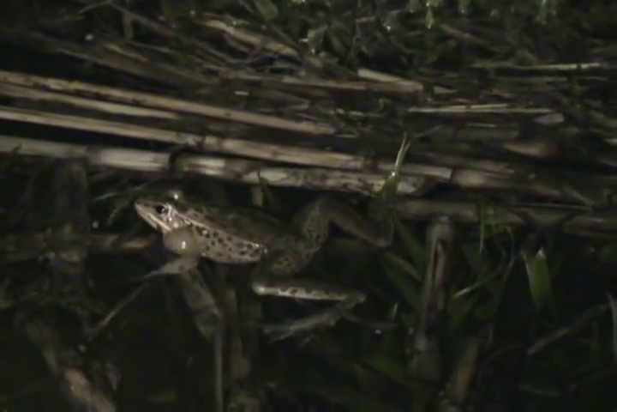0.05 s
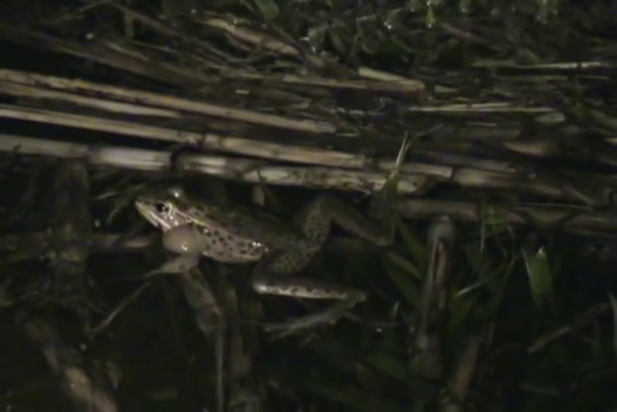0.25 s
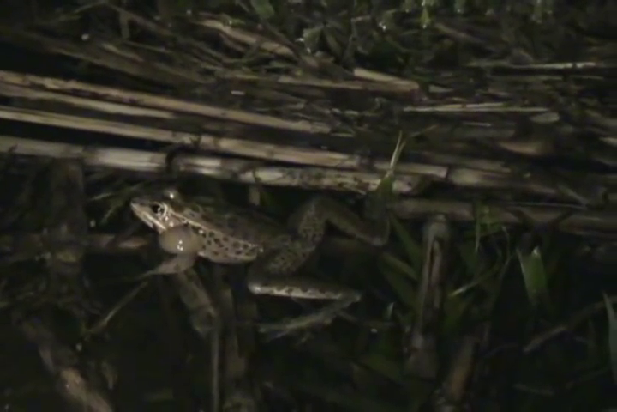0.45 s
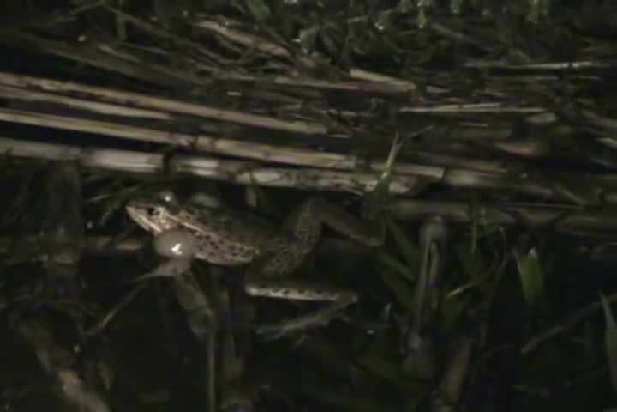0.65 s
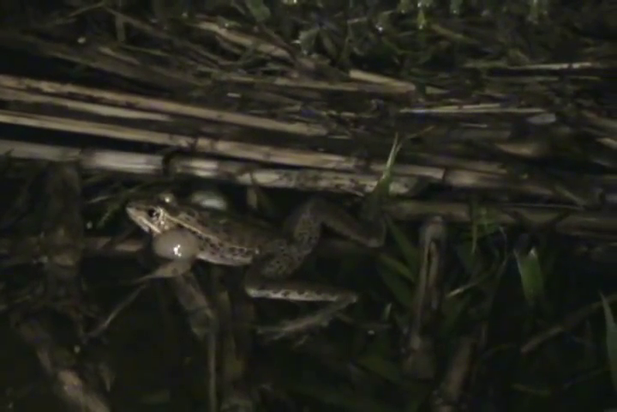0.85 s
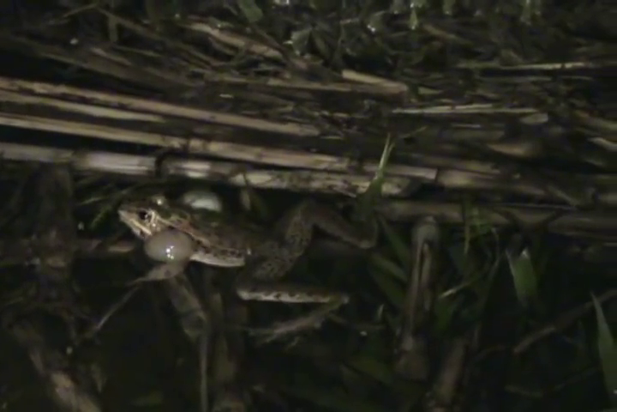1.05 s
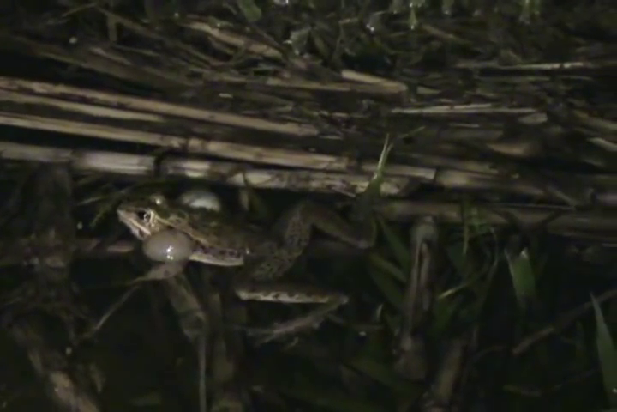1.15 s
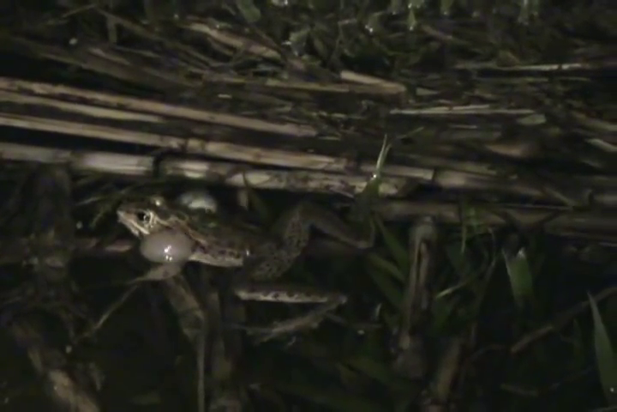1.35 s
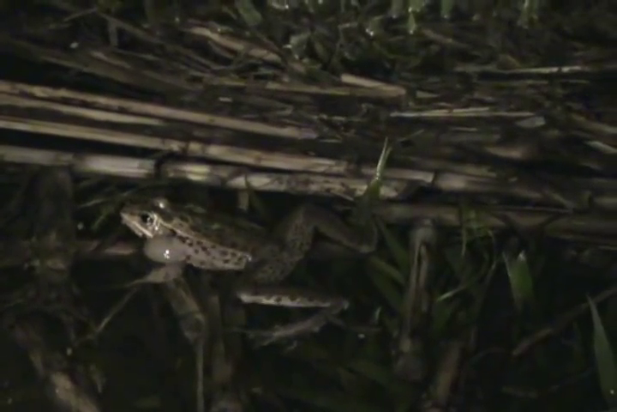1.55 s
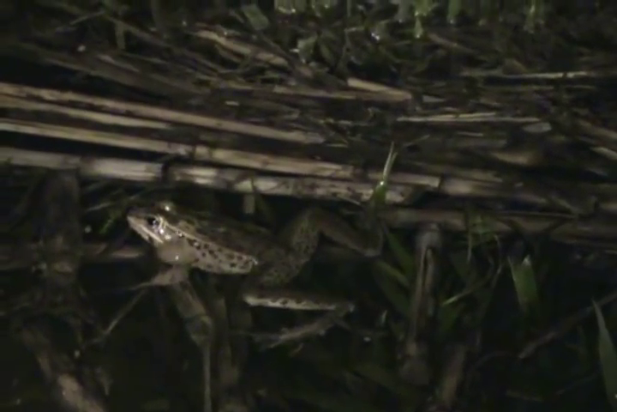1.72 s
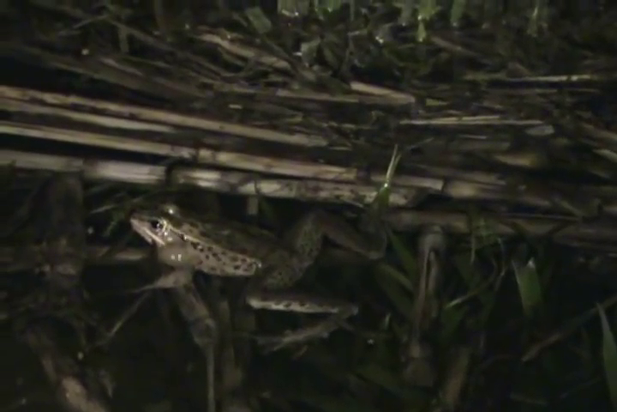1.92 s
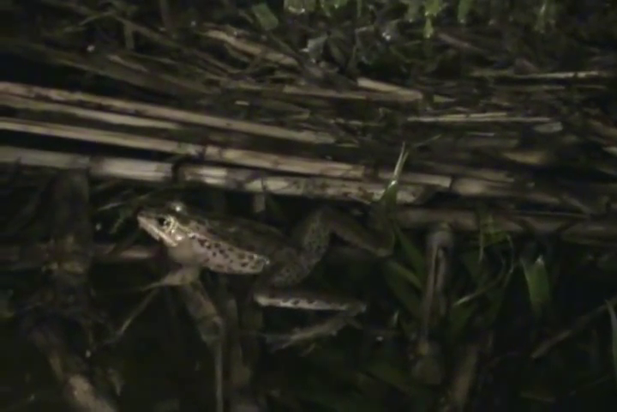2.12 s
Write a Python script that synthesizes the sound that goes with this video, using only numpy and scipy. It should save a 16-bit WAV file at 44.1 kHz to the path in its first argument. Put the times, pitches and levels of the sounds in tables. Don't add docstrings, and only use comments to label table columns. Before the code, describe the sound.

A leopard frog close to the microphone clucks eight times, about every 0.18 seconds from 0.1 to 1.33: the first two faint, then full and loud, each a rapid rattling, hollow burst ending in a soft thump. Small frogs click steadily around 3 kHz, strongest from 0.5 to 1.4, with rising whistled peeps brightest near 1.0-1.4. Afterwards fainter peeps, clicks, distant grumbling clucks and night hiss remain.

```python
import sys
import numpy as np
from scipy import signal
from scipy.fft import rfft, irfft
from scipy.io import wavfile
from scipy.ndimage import uniform_filter1d, map_coordinates

SR = 44100
rng = np.random.default_rng(int(sys.argv[2]) if len(sys.argv) > 2 else 0)


def digitize_waveform(pressure):
    field = np.atleast_2d(pressure).T
    bounded = np.clip(field, -1, 1)
    quanta = np.round(bounded * 32767).astype(np.int16)
    wavfile.write(sys.argv[1], SR, quanta)


def voltage_ratio(decibels):
    exponent = np.asarray(decibels, float) / 20
    return 10 ** exponent


N = 94815


def leopard():
    # last_pulse_s, level_db, top_rate_hz, last_pulse_db, stretch
    call_table = [
        (0.1011, -29.5, 344, 5, 1.03),
        (0.2701, -19, 359.6, -1, 1.11),
        (0.4365, -7.5, 368.8, 3, 0.96),
        (0.613, -5.5, 389, 2.5, 1.14),
        (0.7907, -5.5, 401.6, -10.5, 1.135),
        (0.967, -4, 423, 4, 1.0),
        (1.148, -5, 435, 4, 1.01),
        (1.326, -2.5, 426, -11, 1),
    ]
    # sac_pitch_factor, early_swell_db, rasp_hz, rasp_db
    colour_table = [
        (0.923, 9.5, 4240, -36),
        (0.986, 5, 3770, -23.5),
        (1.008, 1.5, 3300, -17.5),
        (0.993, 2, 2550, -18),
        (1.012, 2, 3150, -25.5),
        (0.992, 0.5, 4500, -24),
        (0.963, 2, 4060, -20),
        (0.957, -3.5, 3990, -17),
    ]
    # time_s, level_db
    late_table = [
        (0.9747, -2.5),
        (1.155, -3.5),
        (1.3305, -3),
    ]
    # mode_hz, width_hz, level_db
    slack_modes = [
        (604, 183, 0.5),
        (1160, 120, -7.5),
        (1830, 200, -15),
    ]
    jitter = 0.008
    rasp_width_hz, rasp_follows_swell = 250, 0.5
    rasp_starts_s, rasp_ends_s = 0.053, 0.024
    thump_hz, thump_width_hz, thump_db = 547, 97, -8

    late_s, late_db = np.array(late_table).T
    voice = sac(pulses(late_s, voltage_ratio(late_db)), modes=slack_modes)
    rasp = thump = 0
    for (end, db, hz, stretch_last_db, stretch), colour in zip(call_table, colour_table):
        pitch, early_db, rasp_hz, rasp_db = colour
        at, ago, swell = cluck(end, hz, stretch, jitter)
        early = early_db * np.clip(ago / 0.033, 0, 1)
        size_db = db + swell + stretch_last_db * (ago == ago[0]) + early
        voice = voice + sac(pulses(at, voltage_ratio(size_db)), pitch=pitch)

        thin = voltage_ratio(rasp_follows_swell * swell + rasp_db) * np.clip(ago / rasp_ends_s, 0, 1) ** 2
        rasp = rasp + ring(pulses(at, thin * (ago < rasp_starts_s)), rasp_hz, rasp_width_hz)

        final = max([end] + [s for s in late_s if 0 < s - end < 0.02])
        blow = pulses(np.array([final]), voltage_ratio(np.array([db + thump_db])))
        thump = thump + ring(blow, thump_hz * hz / 390, thump_width_hz)
    thump = nolow(uniform_filter1d(thump, size=40), 424)
    return pan(voice + nolow(rasp, 2500) + thump, -1.8)


def cluck(end, hz, stretch, jitter):
    # before_last_pulse_s, share_of_top_rate
    rate_curve = [(0, .5), (.004, .66), (.009, .8), (.015, .89), (.025, .96), (.04, 1.0), (.06, .97),
                  (.1, .88)]
    # before_last_pulse_s, level_db
    swell_curve = [(0, -4.5), (.006, 1.5), (.014, -1.5), (.022, -6.5), (.031, -9.5), (.045, -15.5),
                   (.063, -31), (.1, -34)]
    back = np.arange(0, 0.11, 1 / SR)
    rate = hz * np.interp(back / stretch, *np.array(rate_curve).T)
    turns = np.cumsum(rate) / SR
    k = np.arange(int(turns[-1]))
    ago = np.interp(k, turns, back)
    level_chance, time_chance = rng.standard_normal((2, 50))
    swell = np.interp(ago / stretch, *np.array(swell_curve).T) + 0.9 * level_chance[k]
    return end - ago + jitter / hz * time_chance[k], ago, swell


def sac(x, wider=1, pitch=1, modes=None):
    # mode_hz, width_hz, level_db
    sac_modes = [
        (556.5, 130, -3.5),
        (750, 167, -12.5),
        (1112, 215, -7.5),
        (1370, 124, 2.5),
        (1840, 200, -27),
        (2200, 3200, -78),
    ]
    x = signal.lfilter(*signal.butter(2, 2500, fs=SR), x)
    out = 0
    for hz, width, db in (sac_modes if modes is None else modes):
        out = out + voltage_ratio(db) * wider * ring(x, hz * pitch, width * wider)
    return nolow(out, 588)


def ring(x, hz, width):
    r, w = np.exp(-np.pi * width / SR), 2 * np.pi * hz / SR
    return signal.lfilter([0, np.sin(w)], [1, -2 * r * np.cos(w), r * r], x)


def pulses(times, sizes):
    out, at = np.zeros(N + 40), np.clip(times * SR, 10, N)
    i = at.astype(int)[:, None] + np.arange(-7, 9)
    d = i - at[:, None]
    np.add.at(out, i, sizes[:, None] * np.sinc(d) * np.cos(np.pi * d / 16) ** 2)
    return out[:N]


def peepers():
    # start_s, length_s, start_hz, end_hz, level_db
    peep_table = [(-.1, 0.18, 2813, 3093, -26), (-.02, 0.38, 2550, 3080, -34.5),
                  (0.041, 0.42, 2500, 2827, -48.5), (0.106, 0.29, 2625, 3090, -38),
                  (0.493, 0.1, 2487, 2720, -25), (0.979, 0.06, 2830, 2926, -21),
                  (1.035, 0.026, 2940, 3020, -14.5), (1.068, 0.043, 3030, 3134, -12.5),
                  (1.153, 0.058, 3195, 3330, -23), (1.043, 0.095, 2573, 2760, -26),
                  (1.158, 0.049, 2730, 2936, -26), (1.195, 0.2, 2646, 3044, -10.5),
                  (1.117, 0.021, 3140, 3260, -30), (1.292, 0.36, 2637, 3002, -31),
                  (1.469, 0.17, 2480, 2820, -38), (1.606, 0.18, 2563, 2980, -28.5),
                  (1.67, .222, 2655, 3147, -24), (1.741, .21, 2611, 3040, -23),
                  (1.776, 0.24, 2500, 2757, -40), (1.996, 0.097, 2622, 2772, -37.5)]
    peep_pan = [-16.5, 3, 34, -35, 5.5, -6, 6, 3, 2, -14, 8, 2.5, 6, -7, 24, -2, -12, 7.5, -25, 16.5]
    # frequency_ratio, level_db
    partials = [
        (.5, -38),
        (1.5, -33),
        (2, -36),
    ]
    rise_s, fall_s, bend = 0.011, 0.003, 0.0985
    swell_db, push_db, waver_db = 2, 1.83, 0.03
    out, t = 0, np.arange(N) / SR
    for (start, length, hz0, hz1, db), pan_db in zip(peep_table, peep_pan):
        u = np.clip((t - start) / length, 0, 1)
        hz = hz0 + (hz1 - hz0) * (u + bend * u * (1 - u))
        phase = 2 * np.pi * np.cumsum(hz) / SR
        env = np.clip(np.minimum(u * length / rise_s, (1 - u) * length / fall_s), 0, 1)
        breath_db = swell_db * (u - 3.5) + push_db * np.sin(2 * np.pi * u)
        env = env * voltage_ratio(db + 1.0 + breath_db + waver_db * walk(27.8))
        tone = np.sin(phase)
        for ratio, partial_db in partials:
            tone = tone + voltage_ratio(partial_db) * np.sin(ratio * phase)
        out = out + pan(env * tone, pan_db)
    return out


def clickers():
    # time_s, peak_db, pitch_hz
    near_table = [(0.52, -15, 2810), (0.5905, -12.5, 2885), (0.6652, -11, 2790), (0.7437, -8, 2840),
                  (0.828, -9, 2905), (0.9185, -8.5, 2964), (1.013, -8, 3019), (1.1149, -7, 3070),
                  (1.2201, -7, 3043), (1.3239, -18, 3160), (1.4056, -12, 3040), (1.4995, -28, 3190)]
    # time_s, peak_db, pitch_hz, left_minus_right_db
    other_table = [(0.0844, -26, 2810, -13), (0.1326, -28, 2880, 9), (0.2653, -16.5, 2883, -14),
                   (0.3386, -27, 3030, -16), (0.3833, -19.5, 2690, -1), (0.414, -23.5, 3060, 3),
                   (0.4529, -19, 2735, -1), (0.489, -22, 2920, 8), (0.6347, -30, 2980, 10),
                   (0.8085, -23, 2800, -18), (0.871, -57, 2780, -10), (0.8875, -22.5, 2910, 4),
                   (1.947, -34, 2800, -12), (0.1715, -25.5, 2980, -16), (0.3601, -19, 3046, -11.0),
                   (0.4599, -18, 3056, -11.0), (0.5581, -16.5, 3070, -13), (0.6514, -15.5, 3104, -9.5),
                   (0.7223, -20, 3170, -16), (1.5524, -27, 3015, 12), (1.9804, -27.5, 3120, 11),
                   (1.9984, -32, 3290, -10), (2.0283, -24.5, 3160, 5), (2.0647, -30, 3230, 12),
                   (2.0867, -31, 3030, 1), (2.1111, -28, 3190, -12), (2.1274, -29.5, 2975, -11),
                   (.001, -21, 2904, -11), (.032, -33, 3310, -5), (.279, -25, 2780, 7),
                   (.291, -29, 2970, -3), (.318, -21, 2720, -9), (.7068, -24, 2960, 4),
                   (.908, -21, 2980, 5), (.9517, -20, 2660, -2), (.99, -22, 3000, 19),
                   (1.281, -25, 3160, 0), (1.6851, -29, 2640, -6)]
    # time_s, peak_db
    low_table = [(1.432, -30), (1.487, -28), (1.546, -27), (1.603, -28.5), (1.661, -29), (1.728, -30),
                 (1.7908, -22.5), (1.8617, -27.5), (1.927, -33), (2.0023, -33.5), (2.073, -33),
                 (2.141, -36)]
    near = clicks([(*row, -1.5) for row in near_table], -17.5)
    low = clicks([(*row, 2480, 1.5) for row in low_table], -28)
    return near + clicks(other_table, -18) + low + crowd()


def crowd():
    (when, depth), (tune, side) = rng.random((500, 2)).T, rng.standard_normal((500, 2)).T
    peak_db = -35 - 2 * np.log(0.016 + depth)
    return clicks(zip(when * N / SR, peak_db, 2873 + 144 * tune, 4 * side), -39)


def clicks(rows, half_db):
    rise_s, t60_s, tail_t60_s, tail_db = 0.0021, 0.022, 0.028, -16.5
    sag, sag_s, octave_db = 0.044, 0.0048, -28.5
    out, t = np.zeros((2, N + 2000)), np.arange(2000) / SR
    fade = -np.log(1000) * np.clip(t - rise_s, 0, 1)
    env = np.sin(np.pi / 2 * np.clip(t / rise_s, 0, 1)) ** 2
    env = env * (np.exp(fade / t60_s) + voltage_ratio(tail_db) * np.exp(fade / tail_t60_s))
    glide = np.cumsum(1 + sag * (np.exp(-t / sag_s) - 0.5)) / SR
    for s, db, hz, pan_db in rows:
        phase = 2 * np.pi * hz * glide
        halves = np.sin(phase / 2) + 0.6 * np.sin(phase * 3 / 2)
        tone = np.sin(phase) + voltage_ratio(octave_db) * np.sin(2 * phase)
        tone = tone + voltage_ratio(half_db) * env * halves
        i = int(np.clip(s * SR, 0, N))
        out[:, i:i + len(t)] += pan(voltage_ratio(db) * env * tone, np.clip(pan_db, -8, 8))
    return out[:, :N]


def far():
    # last_pulse_s, level_db, top_rate_hz
    far_table = [
        (.215, -33, 341.6),
        (1.505, -34.5, 335),
        (1.64, -37, 352),
        (1.69, -41, 310),
        (1.81, -36, 329.5),
        (1.865, -44, 353),
        (2.012, -33.5, 313.4),
        (2.075, -40, 362),
    ]
    grumble = 0
    for pan_db, share in ((5.5, 0.8), (6.0, 0.73), (-11.0, 1.2)):
        gaps = np.exp(0.25 * rng.standard_normal(2000))
        times = np.cumsum(gaps) / (200 * share)
        train = pulses(times, rng.standard_normal(2000) * 0.5 + 1)
        train = train * voltage_ratio(4.5 * (walk(12.48) + 0.56 * walk(41.75)))
        grumble = grumble + pan(sac(train, wider=1.7), pan_db)
    trains = 0
    for end, db, hz in far_table:
        at, _, swell = cluck(end, hz, 0.786, 0.044)
        trains = trains + pulses(at, voltage_ratio(db + swell))
    return voltage_ratio(-43.5) * grumble / np.std(grumble) + pan(sac(trains, wider=1.41), -2.3)


def walk(rate):
    k = int(SR / rate)
    held = np.repeat(rng.standard_normal(N // 100), k)[:N]
    return 1.3 * uniform_filter1d(uniform_filter1d(held, k), k)


def pan(x, db):
    return x * voltage_ratio(np.array([[db / 2], [-db / 2]]))


def nolow(x, hz):
    return signal.sosfilt(signal.butter(8, hz, "high", fs=SR, output="sos"), x)


def echo(x, t60):
    t = np.arange(8000) / SR
    tail = rng.standard_normal((2, len(t))) * np.exp(-np.log(1000) * t / t60) * (t > 0.003)
    tail = tail / np.sqrt((tail ** 2).sum(1, keepdims=True))
    return signal.fftconvolve(x, tail, axes=1)[:, :N]


def night():
    # frequency_hz, density_db
    air_spectrum = [(30, -7), (162, -2), (348, -8.5), (519, 0.5), (1430, -34), (1820, -34), (2300, -5),
                    (3500, -11), (4300, -8.5), (5600, -23)]
    f, (hz, db) = np.arange(N // 2 + 1) * SR / N + 1, np.array(air_spectrum).T
    shape = voltage_ratio(np.interp(np.log(f), np.log(hz), db))
    mid, side = irfft(rfft(rng.standard_normal((2, N))) * shape, N)
    out = mid + 1.14 * nolow(np.array([side, -side]), 103)
    return voltage_ratio(-49) * out / np.std(out)


def scene():
    frog, whistles, small, distant = leopard(), peepers(), clickers(), far()
    wet = voltage_ratio(-27.5) * echo(frog, 0.15) + voltage_ratio(-7.5) * echo(small, 0.15)
    wet = wet + voltage_ratio(-8.5) * echo(whistles, 0.13) + echo(distant, 0.05) / 2
    return frog + whistles + small + distant + wet + night()


def band_limit(x):
    return signal.sosfilt(signal.butter(12, 16340, fs=SR, output="sos"), x)


def record(dry):
    headroom, lopsided, bump_hz = 1.15, 0.33, 122
    chip_rate_hz, clock_jitter_samples, top_hz = 48000, 0.064, 15750
    x = headroom * np.tanh(dry / headroom)
    x = x + lopsided * signal.lfilter(*signal.butter(2, bump_hz, fs=SR), (x ** 4).mean(0))
    at = np.floor(np.arange(N) * chip_rate_hz / SR) * SR / chip_rate_hz
    at = at + clock_jitter_samples * rng.standard_normal(N)
    x = np.array([map_coordinates(c, [at], order=5, mode="mirror") for c in x])
    x = signal.sosfilt(signal.ellip(8, 0.2, 30, top_hz, fs=SR, output="sos"), x)
    return band_limit(x)


dry = scene()
out = record(dry)
digitize_waveform(out)
```